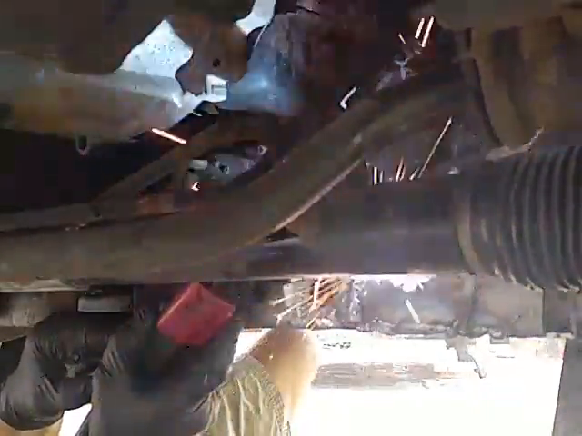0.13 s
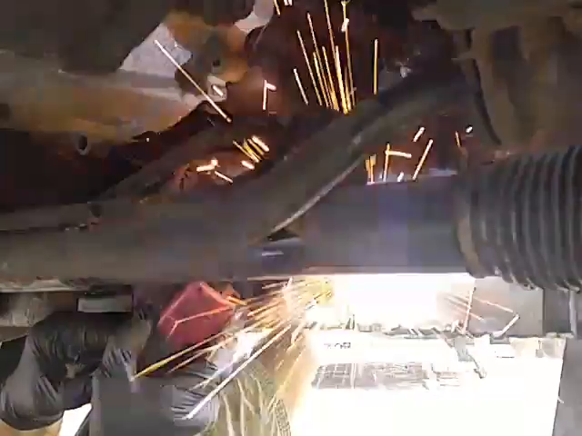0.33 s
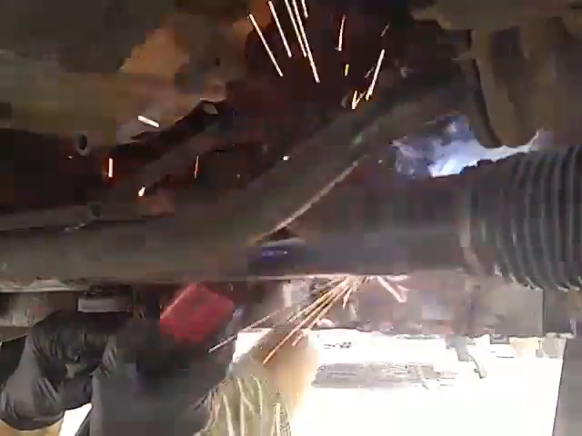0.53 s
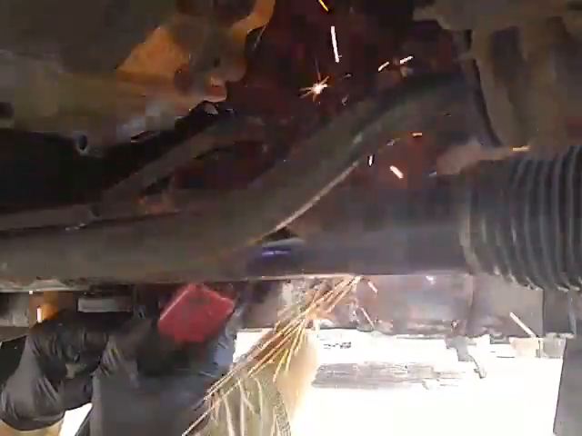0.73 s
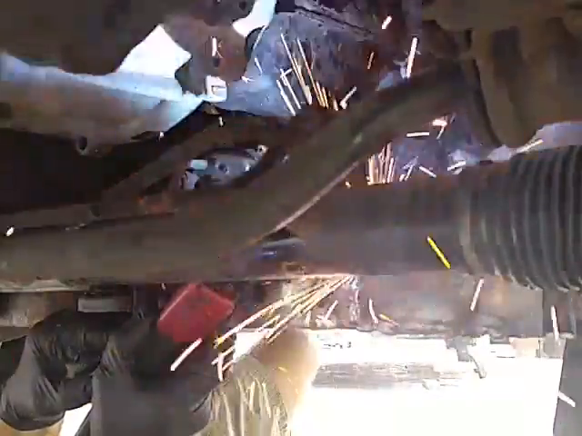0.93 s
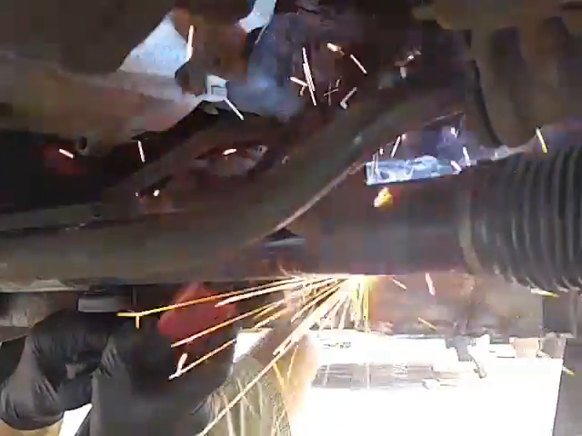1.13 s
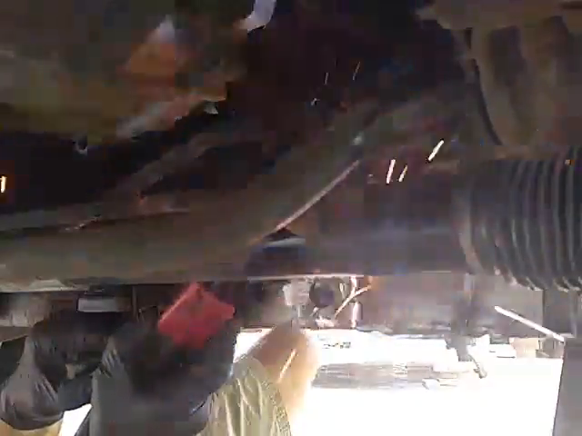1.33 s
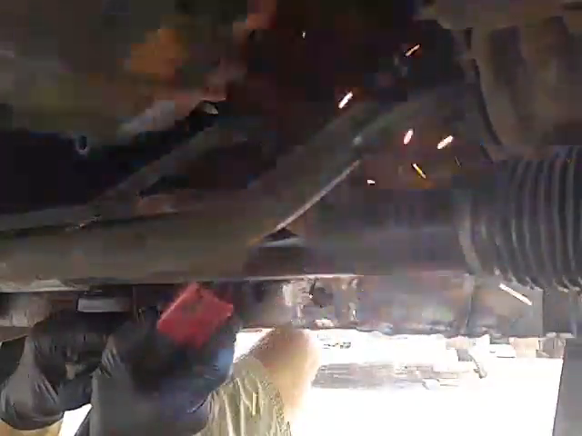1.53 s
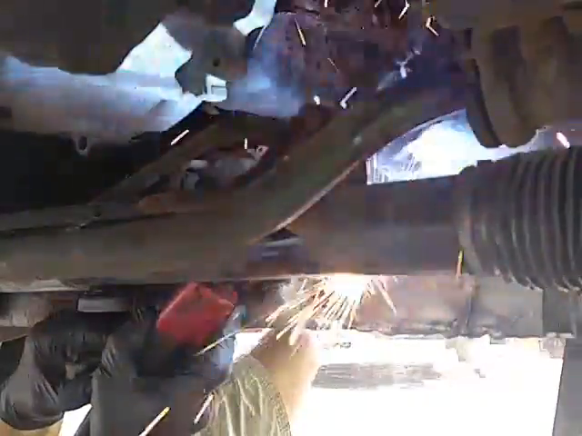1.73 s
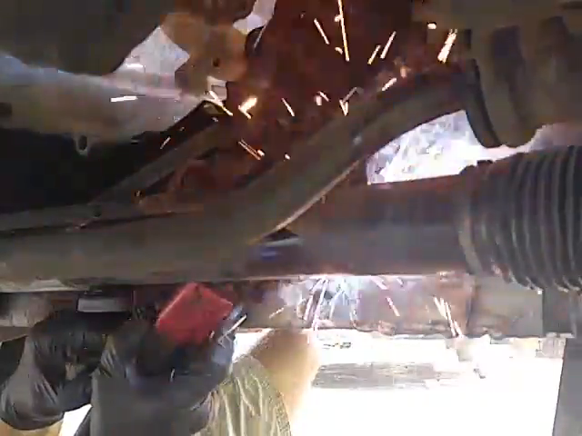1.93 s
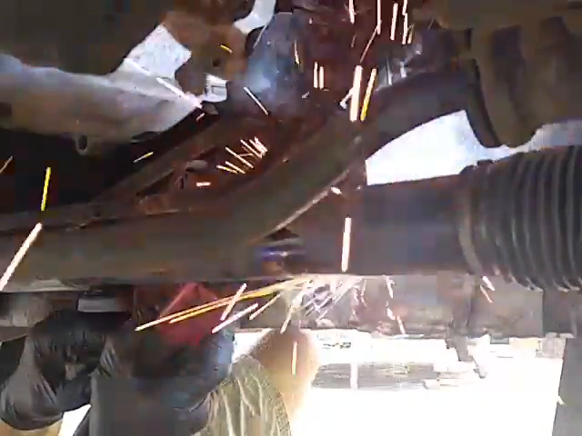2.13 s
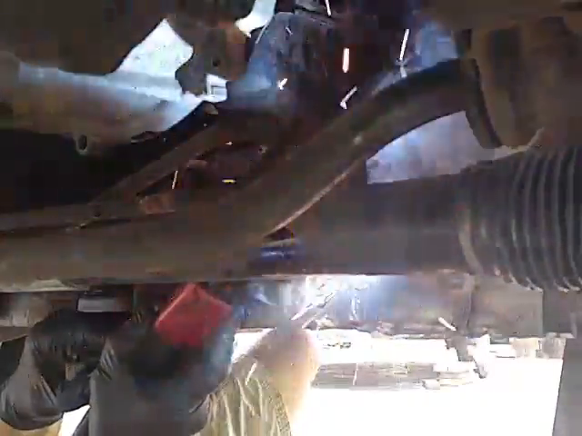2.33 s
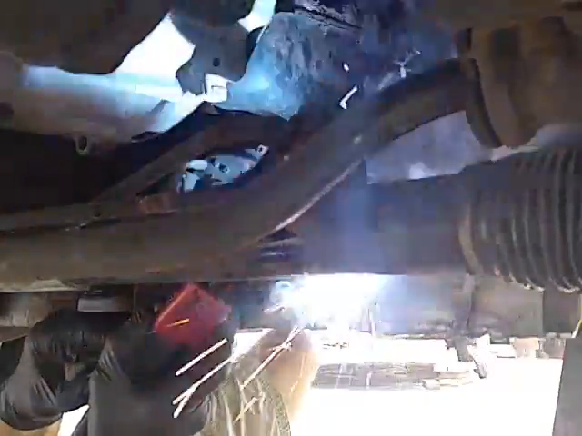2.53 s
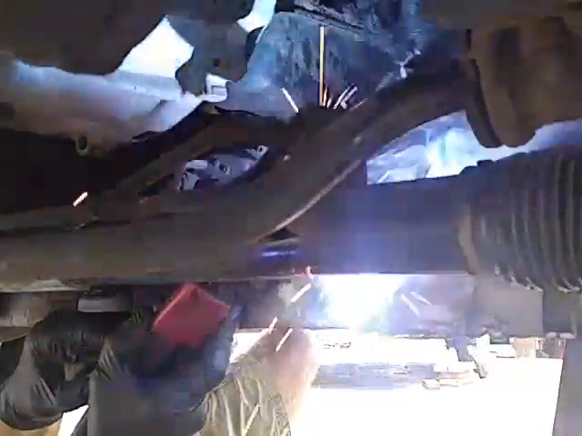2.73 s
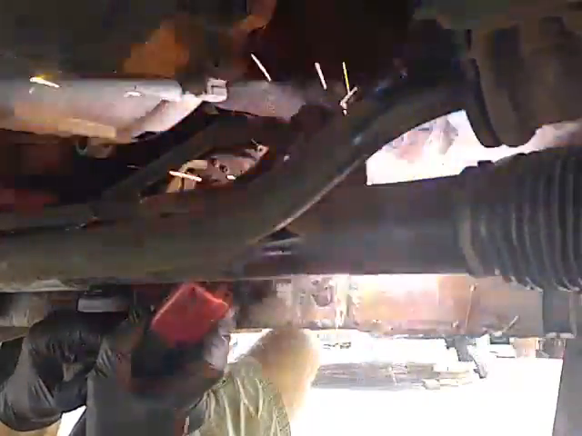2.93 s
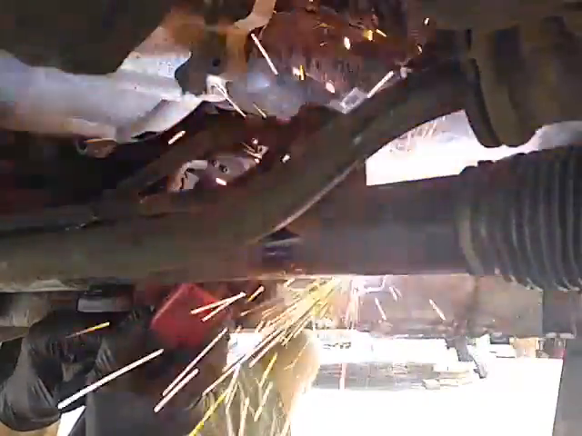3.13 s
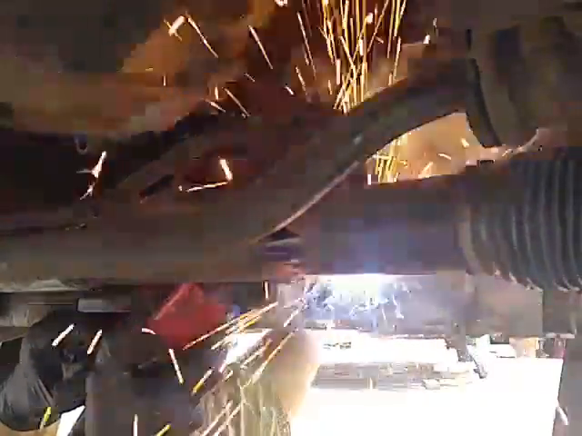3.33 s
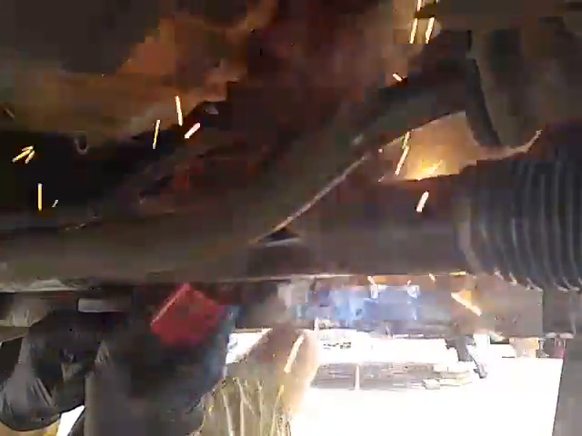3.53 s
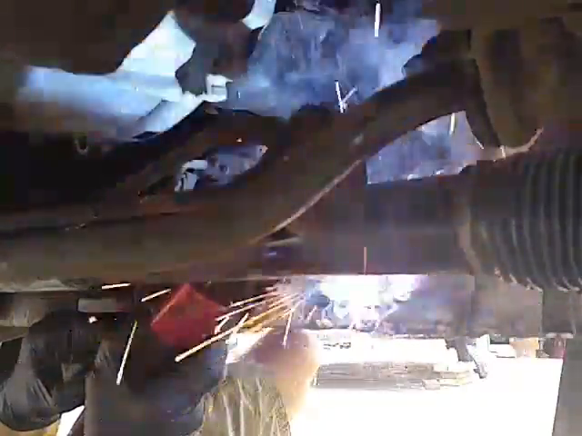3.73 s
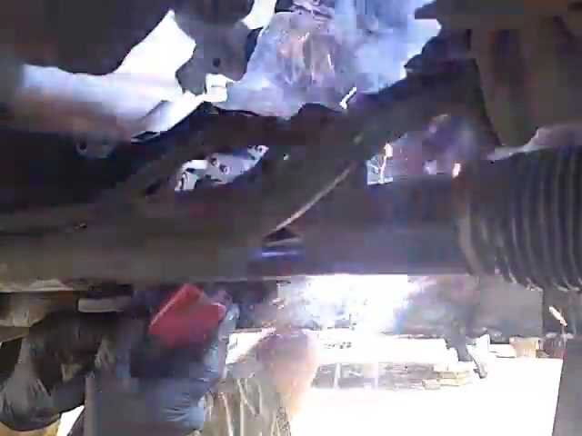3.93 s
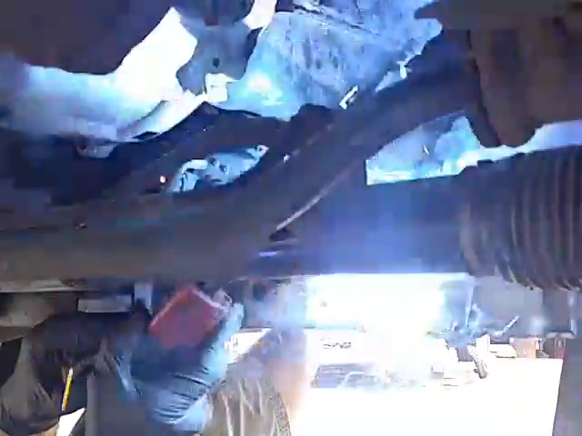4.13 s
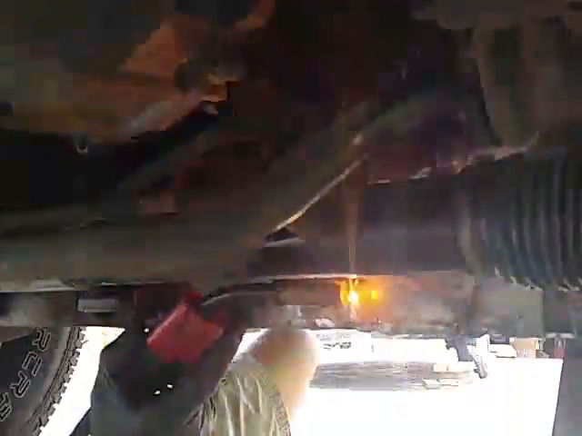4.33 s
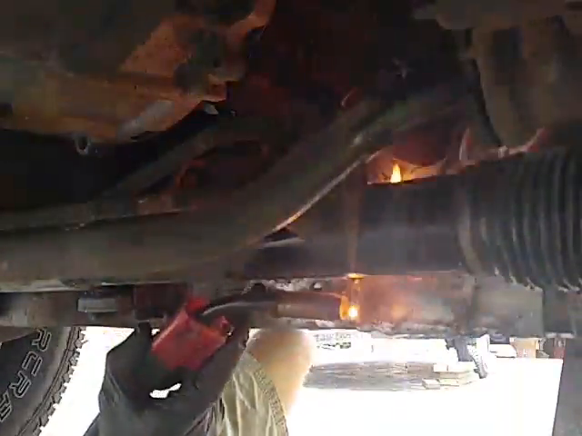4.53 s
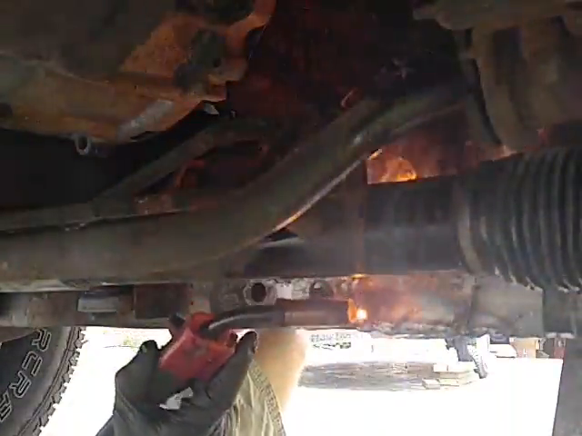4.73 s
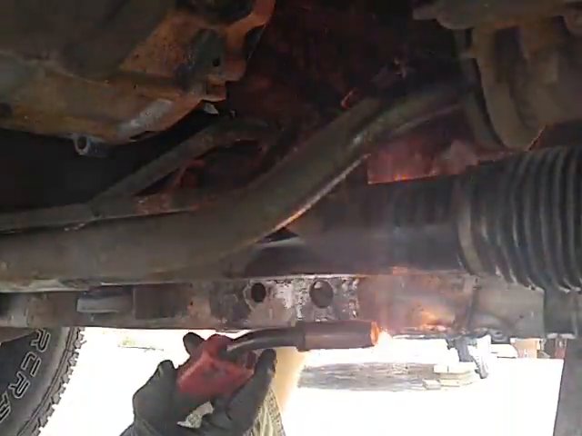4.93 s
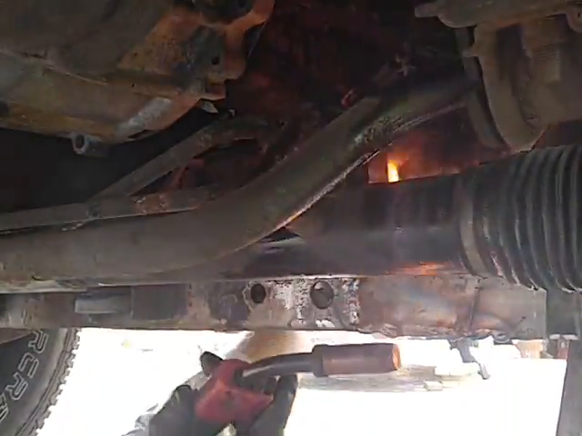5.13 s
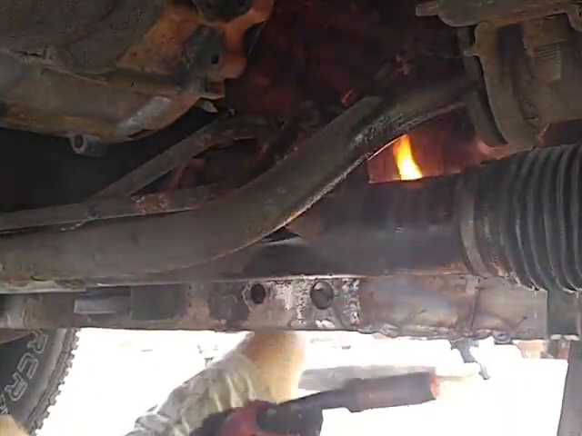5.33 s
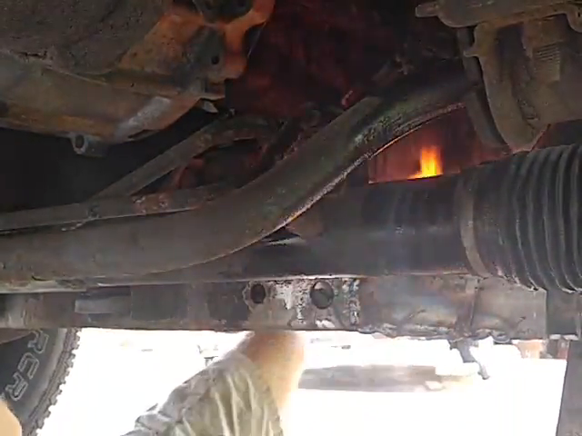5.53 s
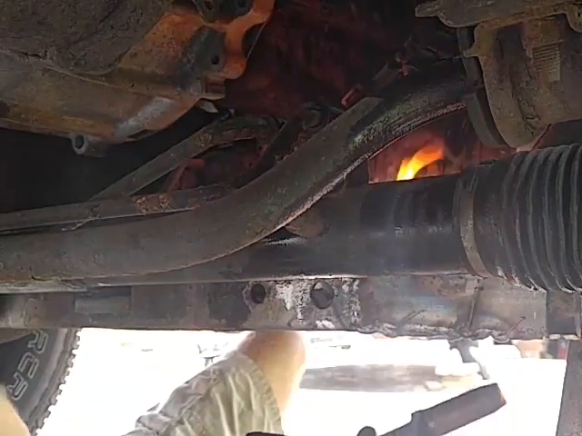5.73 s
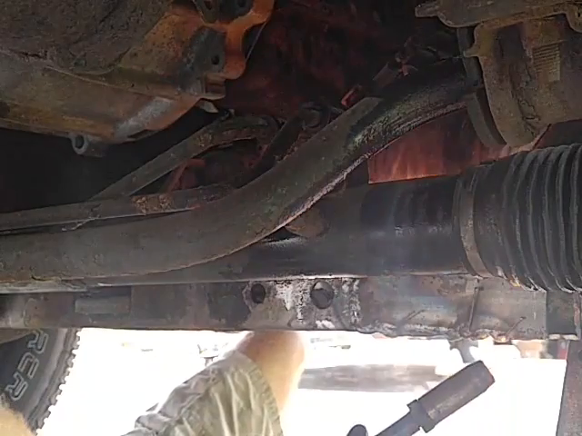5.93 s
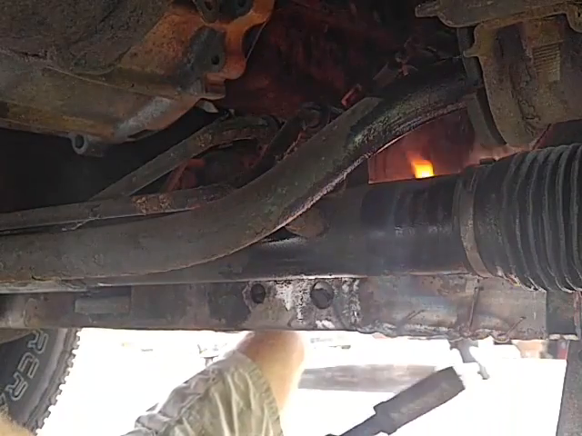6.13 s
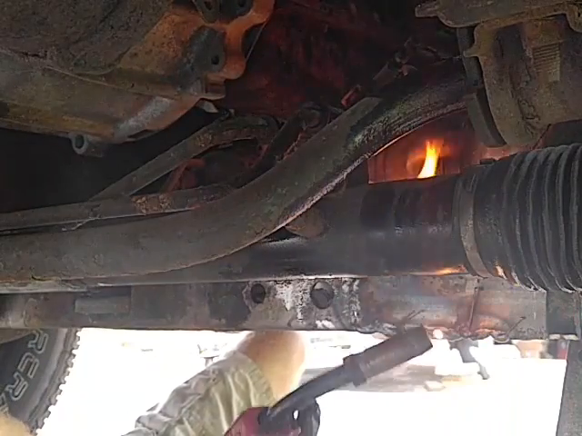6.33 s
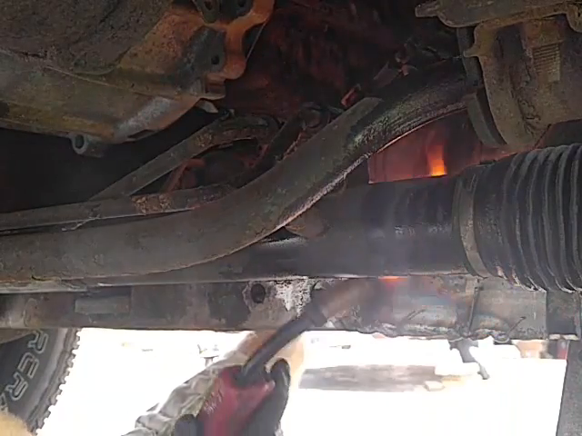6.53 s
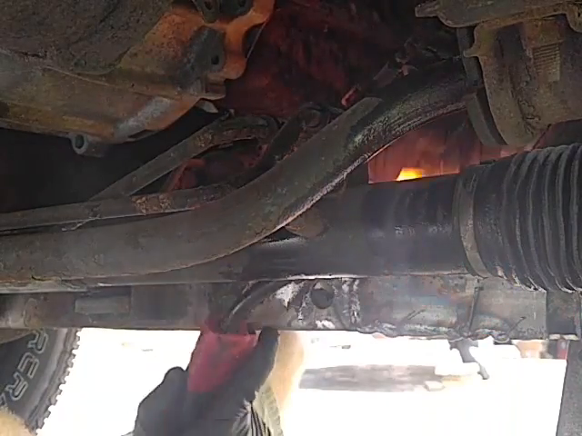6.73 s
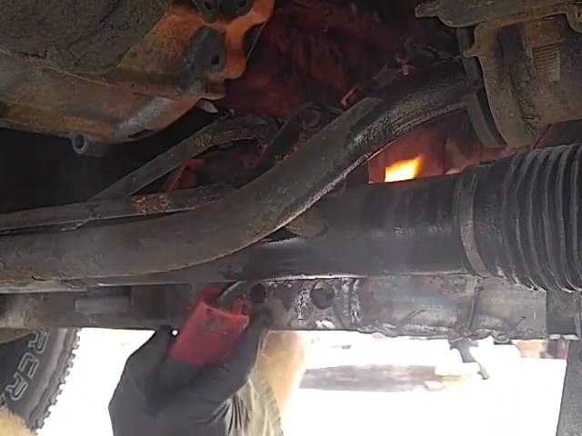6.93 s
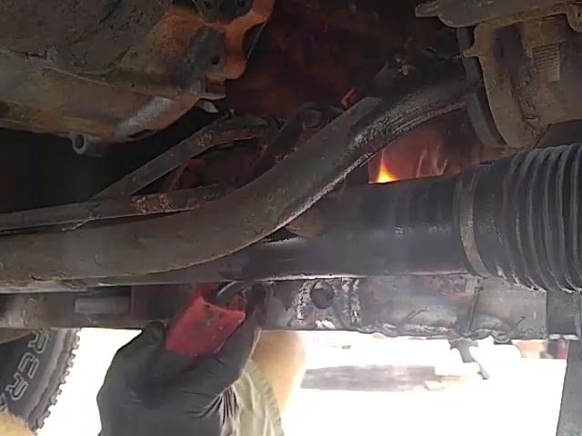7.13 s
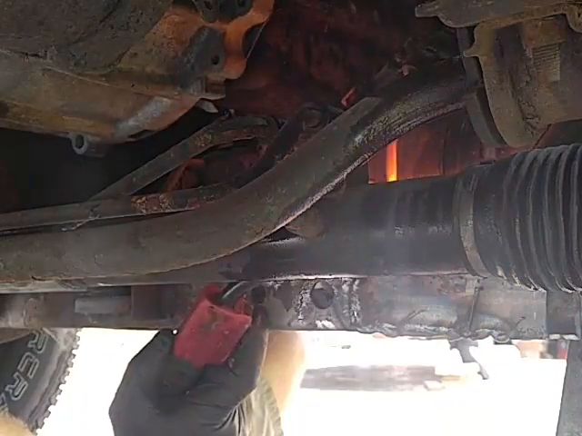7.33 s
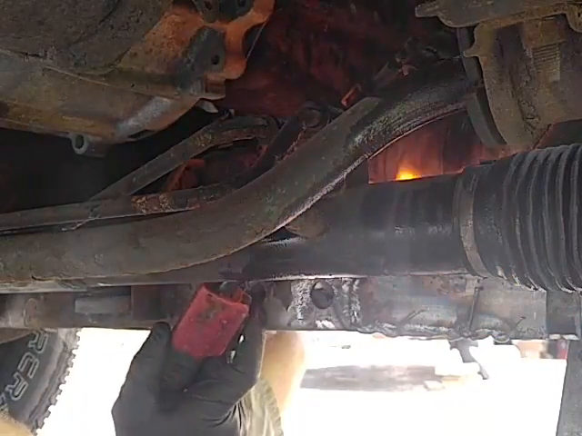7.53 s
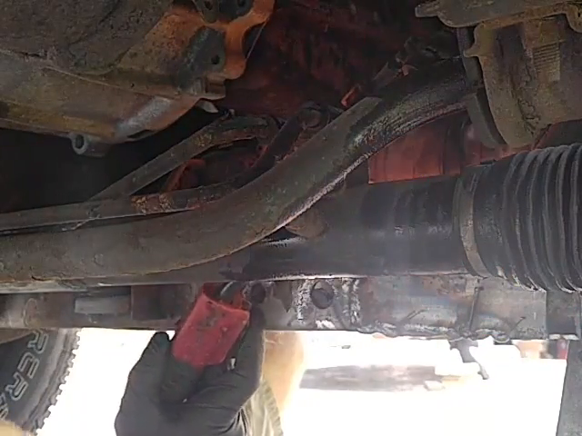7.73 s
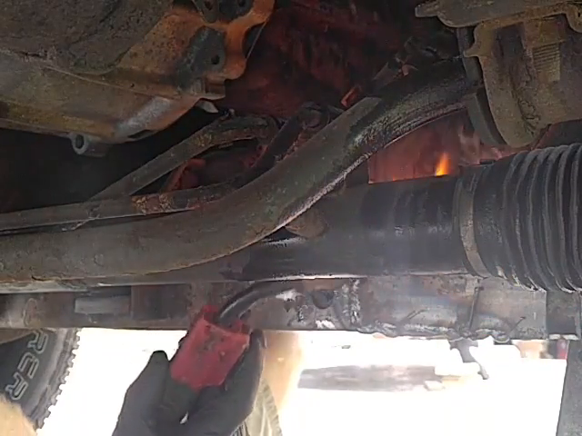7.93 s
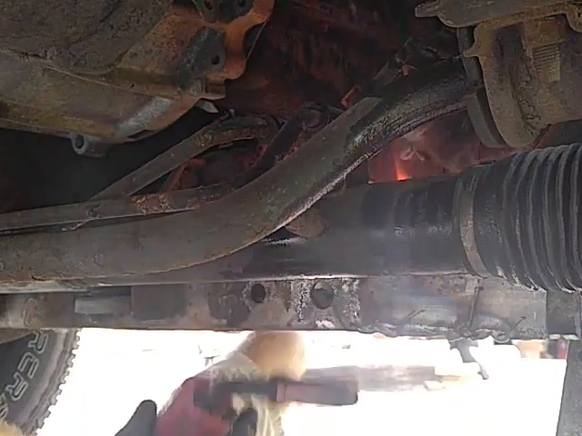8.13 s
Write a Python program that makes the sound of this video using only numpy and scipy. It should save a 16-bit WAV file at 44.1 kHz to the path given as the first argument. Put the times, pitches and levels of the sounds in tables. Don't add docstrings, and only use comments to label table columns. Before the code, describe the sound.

Close under a steel truck frame in a workshop, a welding arc is already spitting at 0 s: loud, bright, irregular snaps with brief metallic echoes and sizzling stutters, the hardest overloading the small microphone into short low thumps. From about 1.7 to 2.5 s the snaps crowd into a rough, rapid buzz, then become sparser, heavier pops until a last crack near 4 s. The arc stops and the much quieter background lifts: a steady machine fan whine rising slightly in pitch as the load goes, soft air and low rumble through an open door. Gloves rustle at once; a dull knock lands at 4.5 s. From 5 s small, crisp ticks of cooling slag and nozzle gather, densest around 6.3-7.1 s, amid glove rubs and a passing swell of rumble near 6.7 s. Light double knocks and a tiny squeak come at 7.8 s, then faint rustle and ticks to about 8 s.

```python
import sys
import numpy as np
from scipy import signal
from scipy.fft import rfft, irfft
from scipy.io import wavfile
from scipy.ndimage import uniform_filter1d

SR = 44100
rng = np.random.default_rng(int(sys.argv[2]) if len(sys.argv) > 2 else 0)


def store_wav(level_fs):
    pcm = np.round(np.clip(np.atleast_2d(level_fs), -1, 1) * 32767)
    wavfile.write(sys.argv[1], SR, pcm.T.astype(np.int16))


def convert_level_to_amplitude(level_db):
    exponent = np.asarray(level_db, float) / 20
    return 10 ** exponent


N = 360738
TIME = np.arange(N) / SR

# (t/s, peak level/dB, kick/dB, churn/dB, recovery/ms)
DIPS = [(0.0112, -14, -6, -20, 2.5), (0.1864, -14.5, -2.5, -14, 1.83), (0.295, -13, -5, -16, 2.3),
        (0.5687, -6.5, -3, -17, 3), (.642, -9, -5.5, -14.5, 2.6), (0.6989, -6.5, -5.5, -9, 2.15),
        (0.9057, -6.5, -11.5, -25, 2.5), (1.2766, -8.5, -10, -20, 1.9), (1.343, -10, -9, -24, 2.35),
        (1.498, -9, -13.5, -27, 2.5), (1.66, -11.5, -15.5, -42, 2.4), (1.842, -8, -2.5, -18, 2.5),
        (2.0661, -9.5, -13.5, -18, 1.7), (2.338, -7.5, -2.5, -18, 2.14), (2.574, -7.5, -13, -22, 2.2),
        (3.0321, -2, -1.5, -13, 3.6), (3.446, -6.5, -5, -12.5, 3), (3.5938, -6.5, -7, -11, 2.66)]
# (t/s, peak level/dB, kick/dB, churn/dB, recovery/ms)
LIFTS = [(0.1083, -6, -5, -8.5, 2.84), (.241, -3, -7, -6.5, 2.44), (0.272, -7, -1, -9, 2.44),
         (0.3906, -7.5, -9, -14.5, 3.3), (.603, -5, -7.5, -14, 4.2), (0.8588, -7.5, -14, -27, 2.6),
         (1.0284, -2, -4.5, -12.5, 3.86), (1.064, -9, -5, -13, 2.47), (1.333, -7.5, -10.5, -17.5, 2.7),
         (1.549, 1, -12.5, -9, 4.3), (1.5911, -2.5, -3.5, -7, 2.7), (2.09, -7, -5, -23, 2.6),
         (2.504, -8.5, -11.5, -22.5, 2.6), (2.5417, -6.5, -15, -14, 2.8), (2.8341, 0, -3.5, -9.5, 3.18),
         (2.9827, -6, -10.5, -10, 2.55), (3.109, -7.5, -2.5, -13, 2.56), (3.132, 0, -12, -8.5, 1.94),
         (3.2013, -1, -6, -9, 4.4), (3.5419, -13.5, -32, -20, 4.1), (3.6233, -7.5, -29, -11.5, 2.84),
         (3.9653, -1, -3.5, -12.5, 4.45)]
# (t/s, peak level/dB, kick/dB, churn/dB, recovery/ms)
FLICKS = [(.086, -6, -8, -22, 2.9), (.141, -6.5, -5, -19, 2.7), (.167, -5.5, -3.5, -10, 2.4),
          (0.316, -5, -8, -12, 2.4), (1.169, -5.5, -5.5, -40, 3.1), (1.19, -7, -7.5, -17, 2.5),
          (1.4467, -6, -5, -8.5, 2.37), (3.706, -5.5, -15, -15.5, 2.6)]
# (t/s, peak level/dB)
SNAPS = [(0.0286, -14), (0.044, -12.5), (0.1147, -8), (0.2197, -10.5), (0.2466, -26), (0.3334, -20),
         (0.3424, -17.5), (0.3496, -20), (0.3606, -24), (0.4427, -25), (0.451, -27), (0.4619, -26.5),
         (0.4848, -20), (0.505, -29), (0.5136, -24), (0.5238, -16), (0.5365, -15.5), (0.7673, -12),
         (0.7988, -14), (0.816, -13), (0.8226, -14.5), (0.8308, -16.5), (0.9377, -9), (0.9501, -9),
         (0.9576, -6.5), (0.9661, -12), (0.9973, -9.5), (1.0337, -22), (1.09, -15.5), (1.101, -22),
         (1.1281, -17), (1.2018, -22), (1.2102, -13.5), (1.2485, -11), (1.2914, -11), (1.3536, -11),
         (1.3593, -23), (1.39, -8.5), (1.4791, -12.5), (1.4879, -10), (1.5084, -13.5), (1.5207, -21),
         (1.6344, -17), (1.67, -23), (1.6754, -22), (1.6844, -18), (1.693, -23),
         (1.7015, -20), (1.7105, -19), (1.7234, -24), (1.7336, -13.5), (1.7663, -16), (1.7909, -20),
              (1.8066, -13.5), (1.824, -24), (1.8318, -18.5), (1.877, -19), (1.8861, -11.5), (1.9167, -30),
              (1.925, -21), (1.9396, -14), (1.9609, -14), (1.9689, -17.5), (1.976, -14.5), (1.9848, -21),
              (1.9932, -16), (2.0022, -11), (2.011, -18), (2.019, -13), (2.0306, -8.5), (2.0413, -11.5),
              (2.0536, -13), (2.079, -8), (2.104, -13.5), (2.1178, -17.5), (2.1265, -16), (2.1338, -16),
              (2.1435, -15.5), (2.1536, -18), (2.161, -11), (2.1694, -11.5), (2.1795, -9), (2.202, -12.5),
              (2.2217, -10), (2.24, -9), (2.264, -12), (2.2764, -15.5), (2.2838, -16), (2.295, -15),
              (2.3165, -8), (2.3586, -10.5), (2.371, -13), (2.382, -14), (2.394, -10.5),
         (2.4029, -12.5), (2.4121, -10), (2.418, -12), (2.424, -14.5), (2.431, -8.5), (2.4394, -9),
             (2.447, -16), (2.4524, -17.5), (2.475, -10.5), (2.5182, -7), (2.564, -11.5), (2.5847, -13),
             (2.6149, -13.5), (2.705, -36), (2.717, -20.5), (2.73, -14), (2.7835, -12.5), (2.886, -20),
             (2.9266, -11), (2.9604, -4.5), (2.9763, -8), (3.0067, -13.5), (3.141, -19.5), (3.1588, -15),
             (3.168, -16.5), (3.2388, -20), (3.3115, -16), (3.3232, -9.5), (3.3332, -14.5), (3.345, -18.5),
             (3.3773, -9), (3.4733, -10), (3.4828, -9.5), (3.4923, -14), (3.5047, -16), (3.6522, -10),
             (3.661, -10), (3.6678, -15), (3.7447, -13), (3.8358, -29), (3.8422, -9), (3.8502, -12),
             (3.859, -10), (3.895, -6)]
# (f/Hz, level/dB per Hz)
CLOTH = [(880, -41), (1500, -35.5), (2250, 0), (3280, 0), (4970, -1.5), (6000, 1.5), (7390, 5.5),
         (8300, 2.5), (9000, 0), (10000, 4), (14200, -3.5), (16000, -3)]


def evened(x):
    return x / np.sqrt(np.mean(x ** 2) + 1e-20)


def read(points, hz):
    f, value = np.transpose(points)
    return np.interp(np.log(hz + 1), np.log(f + 1), value)


def along(rows):
    seconds, value = np.transpose(rows)
    return np.interp(TIME, seconds, value)


def add(mix, s, sound):
    part = mix[round(s * SR):][:len(sound)]
    part += sound[:len(part)]


def tinted(x, points):
    gain = convert_level_to_amplitude(read(points, np.fft.rfftfreq(len(x), 1 / SR)))
    return evened(irfft(rfft(x) * gain, len(x)))


def wander(span):
    smooth = uniform_filter1d(rng.standard_normal(N), span)
    return evened(uniform_filter1d(smooth, span))


def grains(per_second, spread_db):
    size = convert_level_to_amplitude(spread_db * np.minimum(rng.exponential(1, N), 4))
    present = rng.random(N) < per_second / SR
    return size * present * rng.choice([-1, 1], N)


def shaped(level_db):
    log_gain = np.log(convert_level_to_amplitude(np.r_[level_db, level_db[-2:0:-1]]))
    return np.fft.ifft(np.exp(log_gain - 1j * signal.hilbert(log_gain).imag)).real[:2048]


def light_strikes():
    return SNAPS


def arc():
    # (start t/s, end t/s, level/dB)
    sizzle = [(0, 0.001, -2.5), (0.328, 0.38, -33), (0.413, 0.484, -23), (0.491, 0.548, -14.5),
              (0.796, 0.832, -17), (0.925, 0.97, -23), (1.084, 1.105, -9), (1.15, 1.167, -16),
              (1.197, 1.207, -7), (1.308, 1.371, -13.5), (1.462, 1.49, -12), (1.643, 1.74, -24),
              (1.826, 1.95, -22), (1.958, 2.19, -25), (2.262, 2.298, -16.5), (2.376, 2.46, -22),
              (2.54, 2.591, -27.5), (2.639, 2.681, -26.5), (2.68, 2.754, -20), (2.71, 2.797, -20.5),
              (2.877, 2.923, -14), (2.934, 3.009, -17), (3.142, 3.16, -21), (3.205, 3.22, -25),
              (3.24, 3.33, -30), (3.45, 3.51, -15.5), (3.634, 3.681, -12), (3.268, 3.306, -41),
              (3.784, 3.83, -20.5), (0.924, 0.946, -18), (3.826, 3.856, -13), (3.994, 4.024, -40)]
    sparks, burn = np.zeros(N), np.zeros(N)
    for s, db in [row[:2] for row in DIPS + LIFTS + FLICKS] + light_strikes():
        add(sparks, s, convert_level_to_amplitude([db - 3.0]))
    for start, end, db in sizzle:
        add(burn, start, convert_level_to_amplitude(db - 34.5) * signal.windows.tukey(round((end - start) * SR), 0.5))
    sputter = evened(grains(2500, 3.2)) * burn
    return frame_reply(sparks + sputter)


def frame_reply(sparks):
    # (f/Hz, level/dB per Hz)
    spark_colour = [(150, -11.5), (480, -18.5), (850, -12.5), (1500, -11.5), (3000, -16), (4500, -11),
                    (5600, -9.5), (6500, -5), (9000, -1), (10500, -1), (11500, -5.5), (13500, -6),
                    (15500, -14), (16500, -10.5)]
    # (f/Hz, width/Hz, lift/dB)
    resonances = [(1460, 130, 3), (2190, 190, 4), (3010, 170, 7), (3870, 140, 6), (4300, 150, 6),
                  (4790, 130, 7), (5220, 220, 7), (5850, 120, 4), (6150, 200, 5), (6480, 320, 5),
                  (7210, 220, 6), (8240, 450, 4), (8700, 110, 6), (9200, 140, 6), (10070, 220, 6),
                  (10350, 170, 4), (10720, 120, 3), (11140, 130, 5), (11560, 170, 3), (12060, 150, 6),
                  (12900, 170, 4), (13560, 150, 5), (14700, 280, 6), (15290, 170, 3)]
    # (f/Hz, width/Hz, cut/dB)
    notches = [(1260, 300, -5), (1830, 200, -3), (3580, 300, -4), (4500, 170, -4), (5430, 150, -7),
               (5990, 120, -5), (6950, 220, -4), (7600, 220, -4), (9420, 170, -7), (10590, 130, -8),
               (11330, 200, -4), (12620, 200, -6), (13350, 200, -5), (14380, 250, -5)]
    # (start t/s, end t/s, shade/dB)
    hidden = [(.41, .47, -0.5), (.56, .61, 5.5), (.69, .71, 5.5), (.855, .9, 14), (0.977, 1.05, 6),
              (1.26, 1.34, -1), (1.95, 2.48, -2), (2.63, 2.71, 5), (2.82, 2.85, 7), (2.87, 2.92, 8.5),
              (2.94, 3.0, -3), (3.0, 3.05, 6), (3.19, 3.22, -2.5), (3.235, 3.3, 8.5), (3.535, 3.58, 18),
              (3.61, 3.64, -7.5), (3.83, 3.87, -0.5)]
    t, hz = np.arange(6000) / SR, np.fft.rfftfreq(4096, 1 / SR)

    tail = convert_level_to_amplitude(-27 - 60 * t / 0.3)
    crack = convert_level_to_amplitude(-60 * t / 0.081) + 3.42 * convert_level_to_amplitude(-60 * t / 0.013) + tail
    crack[[0, 75]] *= 5.5, 3.0
    build = 1 - 0.45 * np.exp(-(t / 0.0012) ** 2)
    late = build * 5.0 * convert_level_to_amplitude(-60 * t / 0.021) + 0.32 * convert_level_to_amplitude(-60 * t / 0.081) + 0.75 * tail

    shade_db = np.zeros(N)
    for start, end, db in hidden:
        shade_db += db * (abs(TIME - (start + end) / 2) < (end - start) / 2)

    colour_db = read(spark_colour, hz)
    steel_db = sum(db / (1 + (2 * (hz - f) / width) ** 2) for f, width, db in resonances + notches)

    low = 1 / (1 + (hz / 4600) ** 8)
    low_db = 20 * np.log10(low)
    dull_db = -10 * np.log10(1 + (hz / 9600) ** 8)
    middle_db = dull_db + 20 * np.log10(1.0001 - low)
    bright_db = -10 * np.log10(1 + (9600 / (hz + 1)) ** 8)
    parts = ((crack, low_db, 0.63), (crack, middle_db, 0), (late, bright_db, -0.31))

    signs, hiss = rng.choice([-1., 1.], 6000), rng.standard_normal(N)
    early = np.exp(-(t / 0.014) ** 2)
    out, energy = 0, 0
    for envelope, part_db, share in parts:
        seen = sparks * convert_level_to_amplitude(share * shade_db)

        paths = rfft(signs * envelope * early)
        paths = irfft(paths / uniform_filter1d(abs(paths), size=5)) * np.exp(-(t / 0.03) ** 2)
        paths *= np.linalg.norm(envelope * early) / np.linalg.norm(paths)

        moving_power = envelope ** 2 * (1 - 0.96 * early ** 2)
        moved = np.sqrt(abs(signal.oaconvolve(seen ** 2, moving_power)[:N])) * hiss

        steel = shaped(np.maximum(colour_db + part_db + 1.05 * steel_db, -90))
        blurred = shaped(np.maximum(colour_db + part_db + 0.6 * steel_db, -90))
        energy += np.sum(steel ** 2) + np.sum(blurred ** 2) * 0
        out = out + 0.83 * signal.oaconvolve(seen, np.convolve(paths, steel))[:N]
        out = out + 0.99 * signal.oaconvolve(moved, blurred)[:N]
    return out / np.sqrt(energy)


def overload():
    # (f/Hz, level/dB per Hz)
    churn_colour = [(120, -41.5), (250, 2), (480, -5.5), (780, 6.5), (1300, -23), (2400, -14.5),
                    (4500, -21.5)]
    # (direction, delay/ms, width/ms)
    dip_kick = (-1, 0.97, 1.6)
    lift_kick = (1, 0.9, 2.4)
    flick_kick = (-1, 1.91, 0.68)
    out, t_ms = np.zeros(N), np.arange(2000) / SR * 1000
    kinds = ((DIPS, dip_kick), (LIFTS, lift_kick), (FLICKS, flick_kick))
    kicks = [(row, kind) for rows, kind in kinds for row in rows]
    churn = tinted(rng.standard_normal(len(kicks) * 2000), churn_colour).reshape(-1, 2000)
    for (row, kind), noise in zip(kicks, churn):
        s, _, kick_db, churn_db, recovery_ms = row
        direction, delay_ms, width_ms = kind
        kick = direction * t_ms / width_ms * np.exp(1 - t_ms / width_ms)
        add(out, s + delay_ms / 1000, convert_level_to_amplitude(kick_db) * kick)
        sweep_hz = 230 + 1600 * np.exp(-t_ms / recovery_ms)
        sweep = np.sin(2 * np.pi * np.cumsum(sweep_hz) / SR)
        body = 0.52 * noise + 0.86 * direction * sweep
        swell = t_ms / 1.85 * np.exp(1 - t_ms / (1.18 + 0.32 * recovery_ms))
        add(out, s + (delay_ms - 1.1) / 1000, convert_level_to_amplitude(churn_db) * body * swell)

    nudge_db, nudge_ms = -12, 0.3
    nudge = t_ms / nudge_ms * np.exp(1 - t_ms / nudge_ms)
    for s, db in light_strikes():
        add(out, s + 0.00084, convert_level_to_amplitude(db + nudge_db) * rng.standard_normal() * nudge)
    return out


def fan():
    # (t/s, f/Hz)
    blade_rate = [
        (0, 239),
        (2.6, 239),
        (4.02, 242),
        (4.19, 248),
        (4.43, 250.4),
        (6.5, 251),
        (8.18, 252.8),
    ]
    # (multiple, level/dB rms)
    blade_tones = [(1, -52.5), (2, -68), (3, -46), (4, -52.5), (5, -66), (6, -61.5)]
    turns = np.cumsum(along(blade_rate) + 0.5 * wander(3000)) / SR
    fading_db = 3.6 * np.maximum(TIME - 5.2, 0)
    out = np.zeros(N)
    for k, db in blade_tones:
        level_db = db + 2.5 - (k == 1) * fading_db + 0.51 * wander(2500)
        out += convert_level_to_amplitude(level_db) * np.sin(2 * np.pi * k * turns)
    return out


def shop():
    # (f/Hz, level/dB per Hz)
    air_colour = [(150, -16.5), (250, -8), (278, -15), (348, -17.5), (444, -27), (501, -29.5), (586, -19.5),
                  (761, -15), (938, -13.5), (1020, -14), (1180, -17.5), (1530, -21), (2860, -31.5),
                  (16000, -51.5)]
    # (f/Hz, level/dB per Hz)
    rumble_colour = [(25, -48.5), (45, -22), (65, 8), (95, -4.5), (135, -2), (180, -12), (240, -24.5),
                     (320, -29), (450, -65)]
    # (t/s, level/dB)
    draught = [(4.2, -48), (4.9, -48), (5.3, -46), (5.7, -44), (6.2, -48.5), (6.45, -42), (6.75, -45),
               (6.95, -47), (7.2, -45.5), (7.5, -45), (8.18, -46)]
    air = convert_level_to_amplitude(-48 + 0.63 * wander(3000)) * tinted(rng.standard_normal(N), air_colour)
    rumble = tinted(rng.standard_normal(N), rumble_colour) * convert_level_to_amplitude(0.62 * wander(1500))
    deep = signal.sosfiltfilt(signal.butter(4, 100, fs=SR, output="sos"), rumble)
    approach_db = 1.87 * np.maximum(TIME - 4.2, 0)
    pass_db = 9.5 * np.exp(-((TIME - 6.72) / 0.15) ** 2)
    upper = convert_level_to_amplitude(-51 + approach_db + pass_db) * evened(rumble - deep)
    return air + convert_level_to_amplitude(along(draught)) * evened(deep) + upper


def gloves():
    # (start t/s, length/s, level/dB)
    strokes = [(3.99, 0.16, -40.5), (5.169, 0.025, -47), (5.215, 0.15, -46), (5.427, 0.053, -61),
               (5.58, 0.18, -44), (5.838, 0.031, -49), (5.967, 0.073, -52), (6.326, 0.2, -46),
               (6.576, 0.039, -48), (6.706, 0.23, -39.5), (7.054, 0.02, -46), (7.253, .07, -67),
               (7.36, 0.038, -57), (7.542, 0.076, -71), (7.74, 0.1, -46), (7.96, 0.026, -52),
               (8.033, 0.21, -59)]
    rubbing = grains(5000, 0.94)
    motion = convert_level_to_amplitude(-54) * (np.arange(N) > strokes[0][0] * SR)
    for start, length, db in strokes:
        add(motion, start, convert_level_to_amplitude(db) * signal.windows.tukey(round(length * SR), 0.5))
    return motion * convert_level_to_amplitude(-6.5 + 2.4 * wander(120)) * tinted(rubbing, CLOTH)


def cooling_ticks():
    # (t/s, peak level/dB, ring f/Hz)
    slag = [(4.0818, -32, 6200), (4.284, -47, 11000), (4.328, -48, 6500), (4.349, -44, 11800),
            (4.551, -49, 10000), (5.996, -43, 9000), (7.039, -46, 12000), (6.83, -29, 10500),
            (5.635, -33, 10500), (5.706, -40, 12000), (4.1148, -28.5, 7600), (4.5163, -55, 2980),
            (4.9263, -37.5, 3000), (5.2431, -39, 8330), (5.284, -35, 9670), (4.186, -42, 7530),
            (5.5519, -43, 9600), (5.217, -47, 12500), (5.304, -39, 13000), (5.367, -41, 13500),
            (5.41, -44, 12400), (5.467, -45, 6500), (5.657, -34, 7500), (5.67, -42, 4500),
            (5.72, -38, 8000), (5.135, -45, 9000), (6.442, -40, 10960), (6.496, -32, 10000),
            (6.94, -47, 12000), (7.003, -45, 11000), (7.066, -35, 6000), (7.121, -44, 10470),
            (7.79, -35, 8970), (7.845, -44, 10000), (8.047, -49, 10000), (8.056, -43, 9000),
            (8.127, -45, 7000), (8.149, -44, 9500), (5.615, -31, 8300), (6.3341, -45, 11300),
            (6.3576, -37, 9820), (6.464, -34, 9900), (6.5107, -27, 10600), (6.734, -25, 3920),
            (6.8106, -30, 7950), (6.861, -26.5, 10200), (6.904, -33, 8360), (7.093, -24, 5780),
            (7.2521, -39, 8000), (7.289, -38, 5700), (7.731, -41, 8100), (7.7734, -35, 9740),
            (7.8156, -28, 3100), (8.0696, -40, 9900)]
    # (t/s, peak level/dB)
    nozzle = [(4.8171, -45), (5.177, -32), (5.3165, -29.5), (5.4388, -37), (5.576, -36.5), (5.7373, -34),
              (5.8527, -37), (5.975, -43), (6.0153, -38), (6.0717, -44), (6.582, -26), (6.638, -39),
              (6.6993, -38), (6.9737, -40), (7.048, -26), (7.3678, -42), (7.609, -38), (7.9689, -44)]
    nozzle_hz = 7200
    ticks = slag + [(s, db, nozzle_hz) for s, db in nozzle]
    out, t = np.zeros(N), np.arange(2000) / SR
    snaps = tinted(rng.standard_normal(len(ticks) * 2000), CLOTH).reshape(-1, 2000)
    snap_fade = convert_level_to_amplitude(-60 * t / 0.058) + 0.26 * convert_level_to_amplitude(-60 * t / 0.0047)
    for (s, db, hz), noise in zip(ticks, snaps):
        noise = 0.71 * noise + 0.63 * signal.lfilter(*signal.iirpeak(hz, 1.6, SR), noise)
        ring = np.sin(2 * np.pi * hz * t) * convert_level_to_amplitude(-60 * t / 0.017)
        add(out, s, convert_level_to_amplitude(db - 3.5) * (0.73 * noise * snap_fade + 0.71 * ring))
    return out


def torch():
    # (t/s, peak level/dB, ring f/Hz)
    knocks = [(4.125, -34, 285), (4.518, -23.5, 780), (4.517, -41, 352), (5.178, -39, 1700),
              (5.74, -31, 860), (5.849, -42, 3000), (7.2, -39, 2020), (7.799, -35, 840), (8.07, -44, 2800),
              (6.588, -35, 1600), (5.6, -42, 2300), (6.735, -36, 1520), (7.774, -29, 1010),
              (7.784, -28, 970), (5.3, -36, 800)]
    out, t = np.zeros(N), np.arange(2000) / SR
    for s, db, hz in knocks:
        scuff = evened(uniform_filter1d(rng.standard_normal(2000), size=5))
        add(out, s, convert_level_to_amplitude(db - 60 * t / 0.041) * (np.sin(2 * np.pi * hz * t) + 0.22 * scuff))
    squeak_s, squeak_db, squeak_hz = 7.793, -34, 9750
    middle = t.mean()
    squeak = convert_level_to_amplitude(squeak_db - 1400 * abs(t - middle)) * np.sin(2 * np.pi * squeak_hz * t)
    add(out, squeak_s - middle, squeak)
    return out


def scene():
    # (t/s, level/dB)
    duck = [
        (0, -5.5),
        (4.02, -1.5),
        (4.17, 2.5),
    ]
    background = convert_level_to_amplitude(along(duck)) * (fan() + shop())
    return (arc() + background + gloves() + cooling_ticks() + torch())[None]


def band_limit(x):
    return signal.sosfilt(signal.butter(12, 16640, fs=SR, output="sos"), x)


def record(dry):
    stage = 0.89 * np.tanh(dry / 0.82)
    bass_cut = signal.butter(5, 50, "high", fs=SR, output="sos")
    kicked = np.clip(stage + signal.sosfilt(bass_cut, overload()), -0.86, 0.86)
    edge = signal.firwin(1023, 15810, window=("kaiser", 9), fs=SR)
    full = np.clip(signal.oaconvolve(kicked, edge[None], "same"), -0.92, 0.92)
    last_edge = signal.firwin(255, 16450, window=("kaiser", 9), fs=SR)
    full = signal.oaconvolve(full, last_edge[None], "same")
    return band_limit(full)


dry = scene()
out = record(dry)
store_wav(out)
```